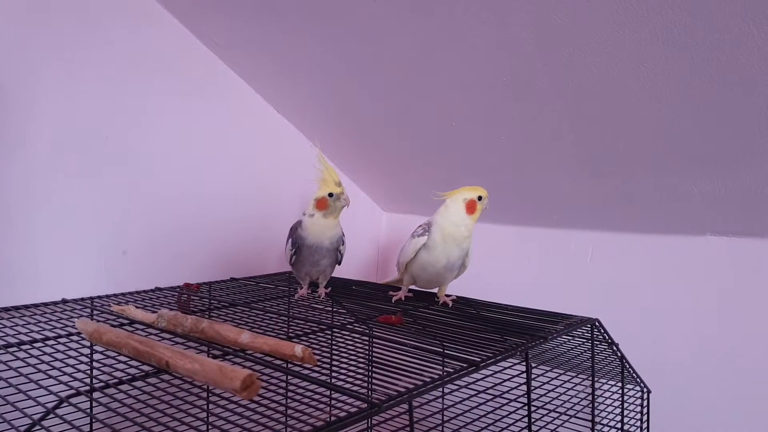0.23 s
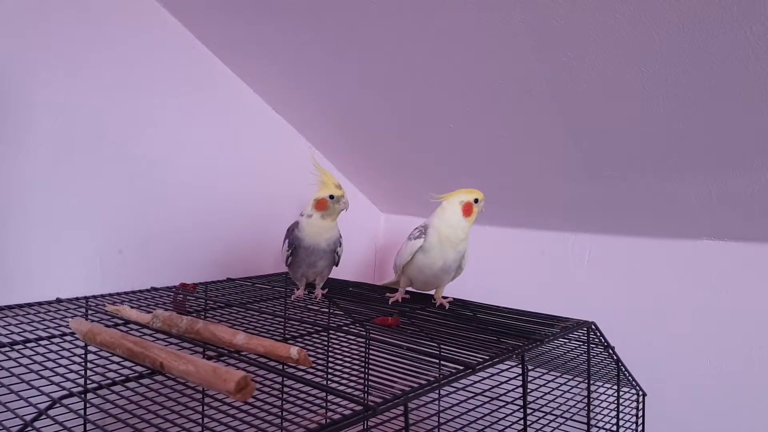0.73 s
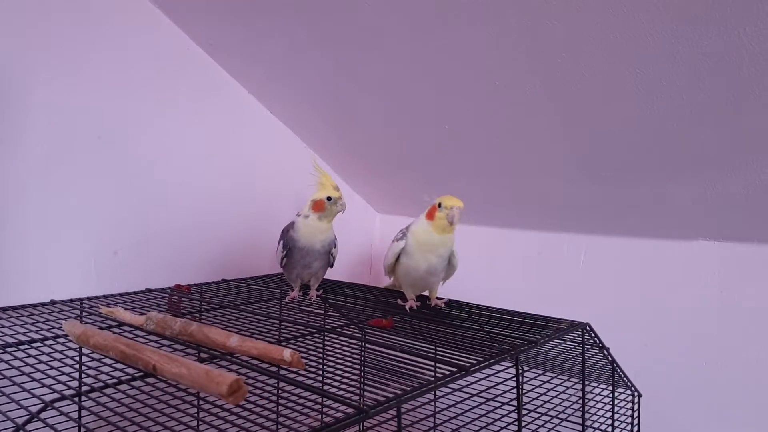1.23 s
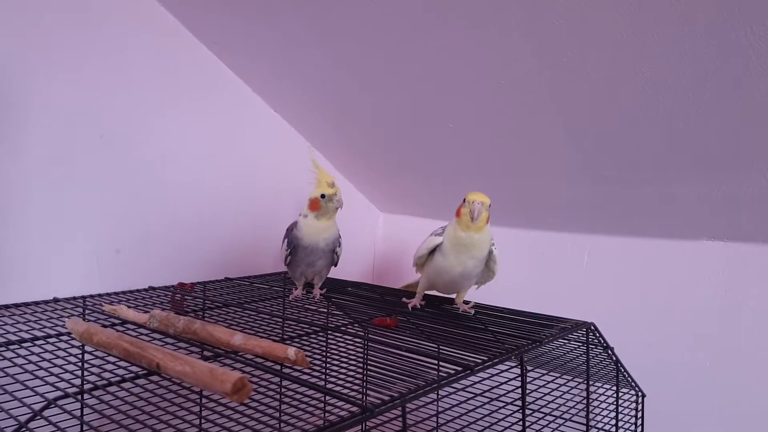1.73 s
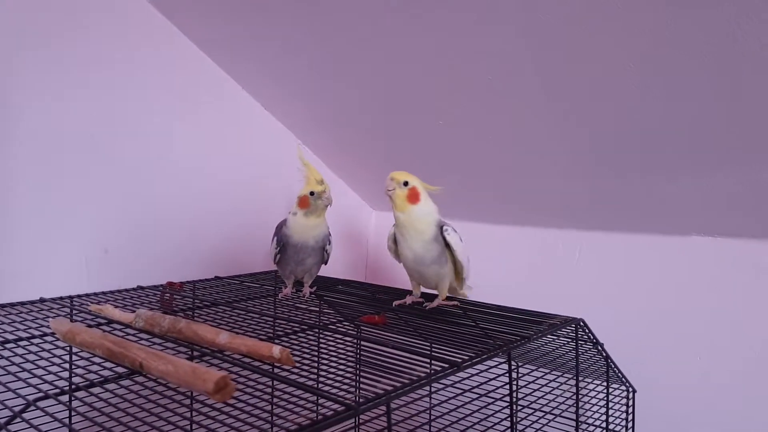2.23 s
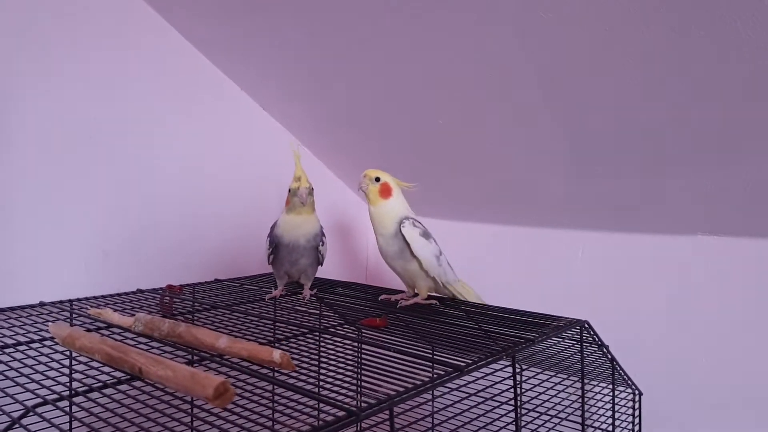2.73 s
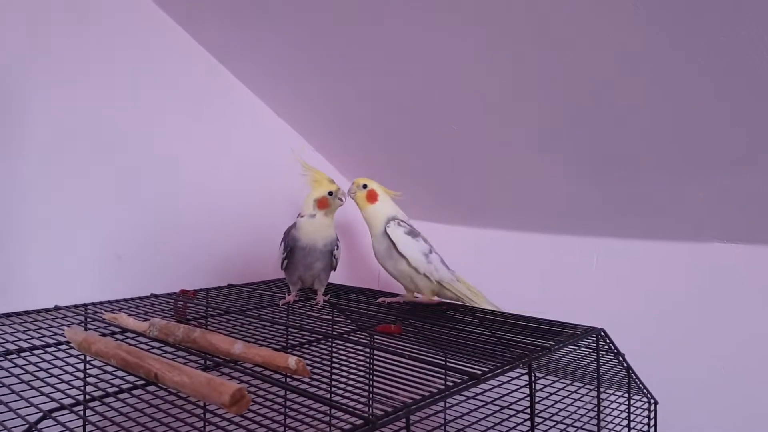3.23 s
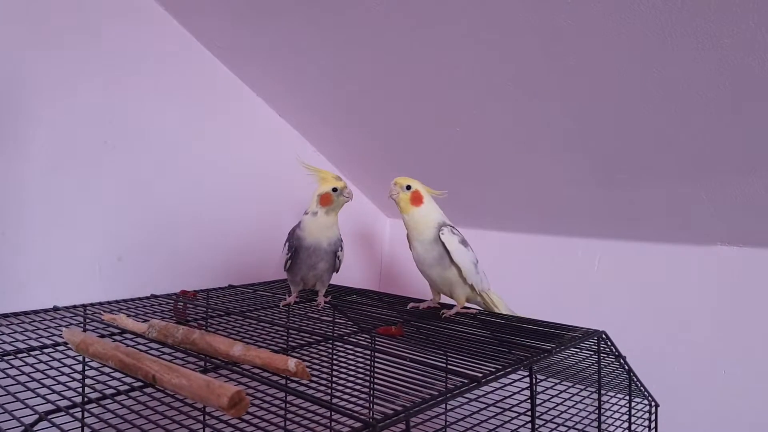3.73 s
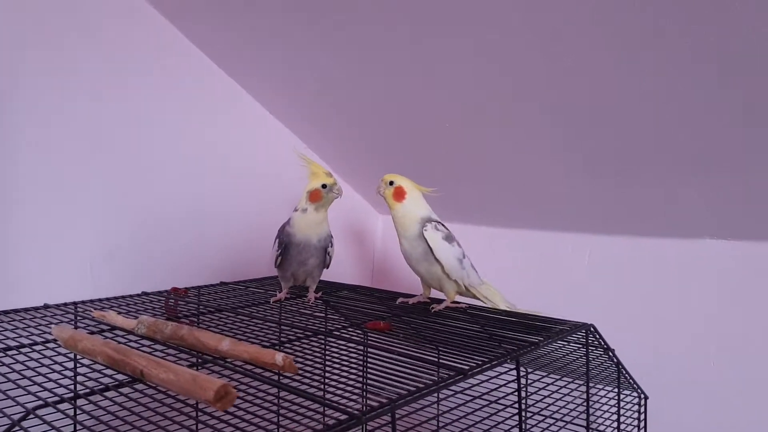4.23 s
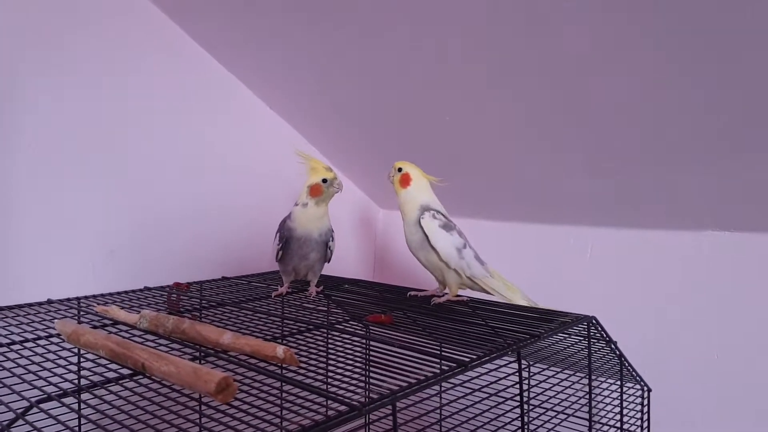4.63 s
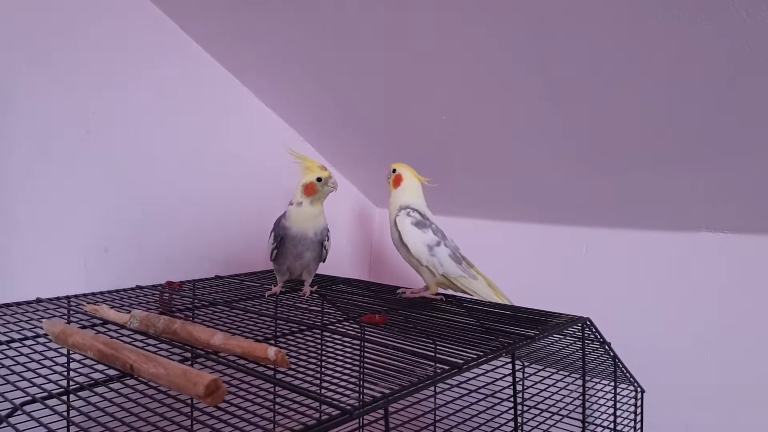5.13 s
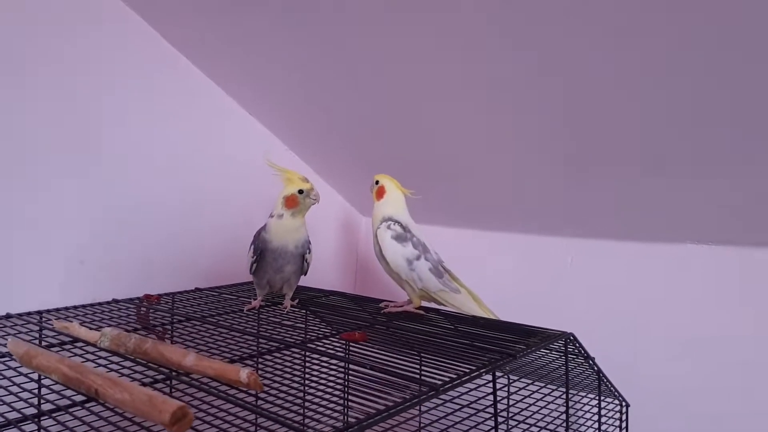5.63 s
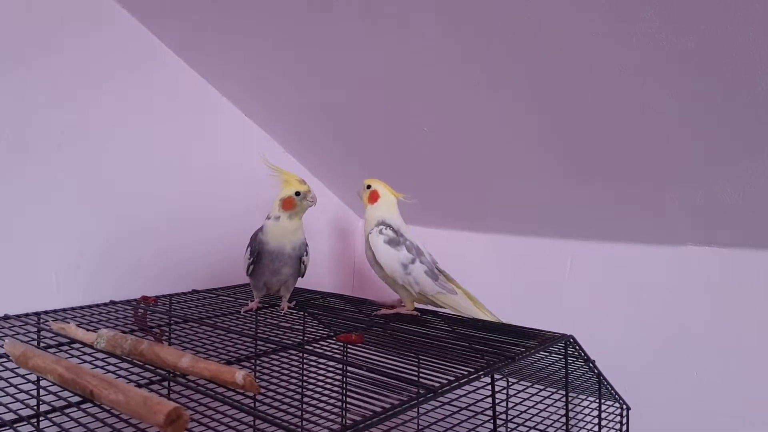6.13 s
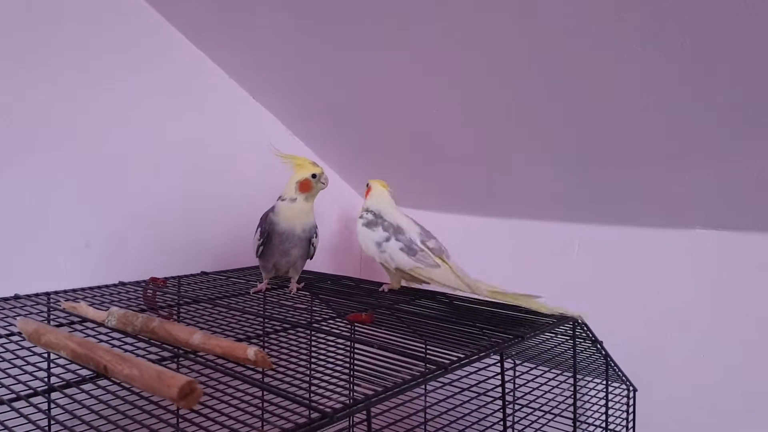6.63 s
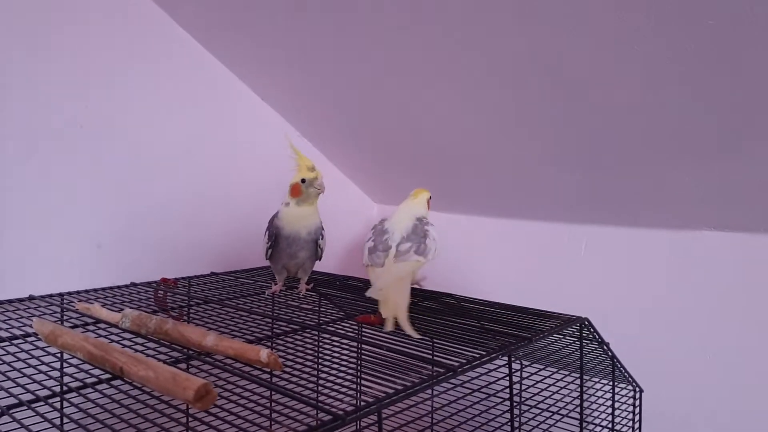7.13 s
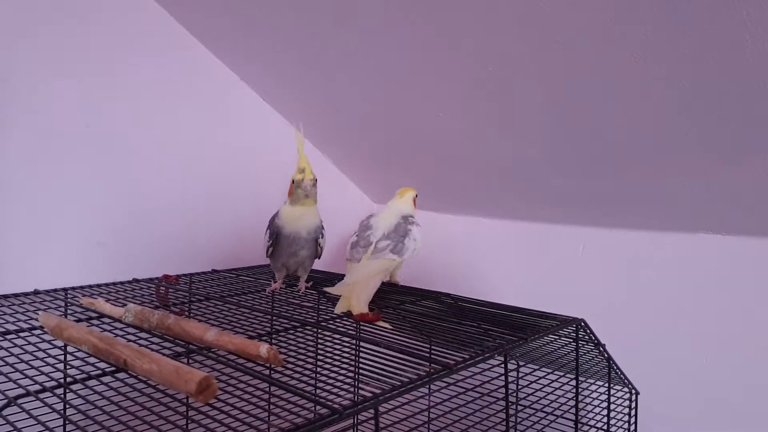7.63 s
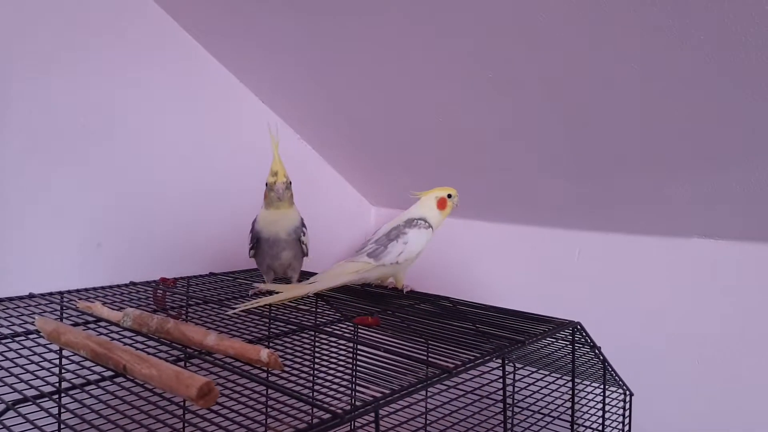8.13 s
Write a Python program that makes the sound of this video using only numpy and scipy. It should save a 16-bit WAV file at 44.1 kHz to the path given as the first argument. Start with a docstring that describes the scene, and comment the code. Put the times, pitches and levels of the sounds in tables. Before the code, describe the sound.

A faint low rumble, wavering mains hum and a thin high whine fill a quiet bare room, left of centre. At about 1.2 s a soft airy puff precedes a sharp, broken chirp at 1.5 s, loud and near, around 2.5 to 3 kHz; the whine then sinks away. From 2.15 to 2.7 s come three short whistles, the last strongest, with dull breath and slight wheeze. At 3.4 s a rising lead-in joins a sharp click and two bright arched notes that plunge low. Two tiny dull taps follow near 4.4 s on the right. The three-call group returns at 4.6 to 5.2 s, trailing a faint wheeze. After a pause and a small puff at 6.2 s, the bird warbles from 6.4 to 8.25 s: quick flicks, low rough steps, slow climbs and piercing arches near 3 kHz. Short echoes ring after the notes.

```python
"""Two small parrots sit on a wire cage under a sloping ceiling. A low rumble, a wavering mains hum and a thin
high whine (filtered noise and sines) come first; the whine sinks as the calls begin. After a puff of air, shaped
noise, one bird whistles short gliding notes, near-sines with a few overtones; a faint wheeze sounds during and
after some calls. A sharp click, then two dull taps, are modelled as pulses; near the end the bird warbles in low
steps, climbs and flicks. Air hisses around the notes, and the bare room rings on after them as decaying noise."""
import sys
import numpy as np
from scipy import signal
from scipy.fft import rfft, irfft
from scipy.io import wavfile
from scipy.ndimage import uniform_filter1d, minimum_filter1d

SR = 44100
rng = np.random.default_rng(int(sys.argv[2]) if len(sys.argv) > 2 else 0)


def to_linear_factor(level_db):
    """Convert decibel levels (scalar or array-like) to linear amplitude factors."""
    exponent = np.asarray(level_db, float) / 20
    return 10 ** exponent


def store_pcm(level_fs):
    """Save levels as 16-bit WAV."""
    pcm = np.round(np.clip(level_fs, -1, 1) * 32767).astype(np.int16)
    wavfile.write(sys.argv[1], SR, np.atleast_2d(pcm).T)


N = 370440
TIME = np.arange(N) / SR


def at_hz(points, hz):
    """Interpolation of a spectrum on a logarithmic frequency axis."""
    points = np.array(points)
    return np.interp(np.log(np.maximum(hz, 1)), np.log(points[:, 0]), points[:, 1])


def rms_one(x):
    """Normalization to unit root-mean-square amplitude."""
    return x / np.sqrt(np.mean(x ** 2) + 1e-20)


def drift(rate, size=N):
    """Slow random modulation: normal random points, rate per second (at most 400), joined by lines."""
    points = rng.standard_normal(int(N / SR * 400) + 2)
    return np.interp(np.arange(size) / SR * min(rate, 400), np.arange(len(points)), points)


def sides(pan_db):
    """Constant-power panning: left and right gains for a left-over-right level difference."""
    left = to_linear_factor(np.asarray(pan_db))
    return np.sqrt(2 / (1 + left ** 2)) * np.array([left, np.ones_like(left)])


def coloured(spectrum, alike, pan_db):
    """Partially coherent stereo noise: mid and side parts set the likeness in each band; rms 1."""
    hz = np.arange(N // 2 + 1) * SR / N
    mid, side = rfft(rng.standard_normal((2, N)))
    like = np.clip(at_hz(alike, hz), -1, 1)
    pair = np.sqrt(1 + like) * mid + np.sqrt(1 - like) * side * [[1], [-1]]
    gains = sides(at_hz(pan_db, hz)) * to_linear_factor(at_hz(spectrum, hz))
    return rms_one(irfft(pair * gains, N))


def fade(t, start, end, edge):
    """Sine-squared envelope, open between start and end, free of clicks."""
    return np.sin(np.pi / 2 * np.clip(np.minimum(t - start, end - t) / edge, 0, 1)) ** 2


# higher harmonics relative to the first: (multiple of the pitch, level [dB])
HARMONICS = [(3, -31), (4, -28), (5, -26.5), (6, -34.5), (7, -24.5), (8, -40.5), (9, -43.5), (10, -61),
             (11, -48.5), (12, -58)]
# throat, beak and microphone colour the higher harmonics: (frequency [Hz], gain [dB])
THROAT_COLOUR = [(3000, 6.5), (4500, 1.5), (6500, 1.5), (7800, -18.5), (9300, -7), (11000, 5), (13000, -5),
                 (15500, -18.5)]
# the head turns: (time [s], left over right [dB], left lags by [ms], brightness of the higher harmonics [dB])
HEAD_TURNS = [(1.54, 10.5, .057, 1.3), (2.15, 8, 0.15, -2), (2.35, 9.5, .066, 2.5), (2.531, 9, .04, -0.5),
              (3.42, 10, .05, -4), (3.561, 6, 0.091, -0.5), (4.632, 7.5, .12, -2), (4.842, 7, 0.1, 6),
              (5.029, 2, -.04, 2), (6.39, 13, -0.098, 2), (6.55, -2, 0.19, -3.5), (6.801, 8.5, .04, 1.5),
              (7.152, 11.5, -0.073, -2), (7.42, 4.5, -.08, -0.5), (7.701, 9.5, 0.14, 2), (8.0, 7, .07, -.5),
              (8.085, 11, .06, 0.7), (8.22, -4, .04, -22)]
# air leaks past slack membranes in low notes: level at the reference pitch, gain per octave below it
LEAK_DB, LEAK_HZ, LEAK_DB_PER_OCT = -65.5, 1500, 4.5


def whistles(jitter=.003, shimmer_db=1.2, rasp=.3, effort=.2):
    """Harmonic synthesis by phase integration: unsteady gliding tones, brighter when blown harder."""
    near, (mono, leak) = np.zeros((2, N)), np.zeros((2, N))
    wobble, shimmer = jitter * drift(250), to_linear_factor(shimmer_db * drift(120))
    grain = np.array([drift(390) for _ in range(3)])
    turns, *head = np.transpose(HEAD_TURNS)
    for s, hz, level_db, second_db in notes():
        pan_db, lag_ms, bright_db = [np.interp(s[0], turns, column) for column in head]
        span = slice(int(s[0] * SR), int((s[-1] + .003) * SR))
        t = TIME[span]
        glide = uniform_filter1d(np.interp(t, s, hz), size=130)
        pitch = glide * (1 + wobble[span] * (3000 / glide) ** 2)   # low notes waver more
        phase = 2 * np.pi * np.cumsum(pitch) / SR
        level = np.interp(t, s, level_db)
        second = to_linear_factor(np.interp(t, s, second_db)) * (1 + rasp * grain[2, span])
        note = np.sin(phase) + second * np.sin(2 * phase)
        slack = rasp * (2900 / pitch) ** 2   # low notes come from slack, rougher membranes
        for k, order_db in HARMONICS:
            k = round(k)
            colour_db = bright_db + at_hz(THROAT_COLOUR, k * pitch) + effort * (level + 13)
            strength = to_linear_factor(order_db + colour_db) * (k * pitch < .4 * SR)
            note += strength * (1 + slack * grain[k % 3, span]) * np.sin(k * phase)
        note *= shimmer[span] * to_linear_factor(level + 3.5) * fade(t, t[0], t[-1], 0.0022)
        lagged = np.interp(t - lag_ms / 1000, t, note)
        near[:, span] += sides(pan_db)[:, None] * [lagged, note]
        mono[span] += note
        leak[span] += to_linear_factor(LEAK_DB - LEAK_DB_PER_OCT * np.log2(glide / LEAK_HZ))
    return near, mono, leak


def notes():
    """Source control: every note as times, pitches, relative levels and second harmonics."""
    return sharp_calls() + arches() + steps() + climbs() + flicks()


def under_top(s, hz, second_db, top_hz, level_db, db_per_oct):
    """Pitch-dependent source strength: a glide is weaker the lower it lies."""
    return s, hz, level_db + db_per_oct * np.log2(hz / top_hz), second_db


# call shapes at unit stretch and pitch factor:
# (time from the onset [s], pitch [Hz], effort [dB], second harmonic against the first [dB])
CHIRP_SHAPE = [(0, 2330, -17, -26), (.012, 2562, 3, -24.5), (.044, 2737, -8, -11.5), (.072, 2745, -2, -29),
               (.082, 2505, -5.5, -18), (.092, 1819, -9.5, 1.5), (.102, 1898, -31, -7.5),
               (.112, 2771, 2, -27), (.126, 3057, -4, -21), (.139, 2838, -13.5, -31.5),
               (.154, 2463, 0.5, -27.5), (.166, 2613, -5.5, -17), (.182, 2396, -11, -37)]
OPENER_SHAPE = [(0, 2482, -5.5, -33.5), (.015, 2647, -0.5, -16.5), (.05, 2701, -0.5, -25.5),
                (.09, 2721, 1.5, -21.5), (.108, 2940, 1, -19.5), (.128, 2763, -11.5, -49),
                (.14, 2750, -26.5, -35)]
SLIDE_SHAPE = [(0, 3262, -21, -14), (.036, 3168, -30, -13), (.079, 3226, -17.5, -15.5),
               (.097, 3233, -8, -17.5), (.104, 2927, -2.5, -11), (.131, 2722, -1, -26.5),
               (.146, 2320, 1.5, -5), (.16, 2241, -9, -1), (.177, 2190, -1.5, -11.5), (.184, 2353, -2, -14)]
SAG_SHAPE = [(0, 3039, -0.5, -16), (.028, 3128, 0, -17.5), (.044, 2990, 0, -30), (.085, 3038, -5.5, -17.5),
             (.12, 2899, -4, -24), (.16, 2810, -14.5, -18.5), (.169, 2780, -22, -9.5),
             (.175, 1800, -29.5, -0.5)]
LEAD_IN_SHAPE = [(0, 1395, -19, -12.5), (.011, 1566, -6.5, -32.5), (.026, 1802, -9, -20),
                 (.048, 2120, 3, -40.5)]
# the calls of each shape: (time [s], stretch in time, pitch factor, relative level [dB])
CHIRP_CALLS = [(1.536, 1.001, 1.001, -12)]
OPENER_CALLS = [(2.147, .96, .995, -17), (4.629, 1.02, 1.005, -17.5)]
SLIDE_CALLS = [(2.347, .997, .99, -18), (4.844, 0.98, 1.015, -18)]
SAG_CALLS = [(2.53, 1.03, .995, -13.5), (5.028, .96, 1.005, -13)]
LEAD_IN_CALLS = [(3.374, 1.001, 1.001, -21)]


def sharp_calls():
    """Similarity of repeated calls: one shape stretched in time and scaled in pitch and level."""
    out = []
    for shape, calls in [(CHIRP_SHAPE, CHIRP_CALLS), (OPENER_SHAPE, OPENER_CALLS), (SLIDE_SHAPE, SLIDE_CALLS),
                         (SAG_SHAPE, SAG_CALLS), (LEAD_IN_SHAPE, LEAD_IN_CALLS)]:
        after, hz, effort_db, second = np.transpose(shape)
        for s, stretch, factor, db in calls:
            out.append((s + after * stretch, hz * factor, db + effort_db, second))
    return out


# arched whistles: (time [s], rise [s], hold [s], plunge [s], from [Hz], top [Hz], relative level [dB])
ARCH_NOTES = [(3.42, 0.013, .03, 0.037, 2536, 2713, -11.5), (3.553, .033, .075, 0.02, 1396, 2747, -13),
              (6.587, 0.032, .097, 0.06, 1815, 3037, -15), (7.203, .048, .112, .045, 1175, 3064, -16),
              (8.083, .035, .042, .024, 2190, 2882, -19.5)]
# (share of the rise, share of the way up to the shoulder, second harmonic [dB])
ARCH_RISE_SHAPE = [(0, 0.015, -23.5), (.25, .3, -33), (.5, .68, -34.5), (.75, .9, -28), (1, 1, -24)]
# (share of the plunge, share of the top pitch, second harmonic [dB])
PLUNGE_SHAPE = [(0, 0.95, -29.5), (0.201, .87, -29.5), (0.361, .63, -3.5), (.65, .48, -18), (1, .45, -23)]
# the rise aims at a shoulder under the top; holds longer than steady dip first
SHOULDER, DIP_PER_S, STEADY_S = 0.93, 1.2, .07
HOLD_SECOND_DB, ARCH_DB_PER_OCT = -26, 23.5


def arches():
    """Frequency modulation in an arch: the pitch rises, holds and plunges low."""
    up, rising, early = np.transpose(ARCH_RISE_SHAPE)
    down, falling, late = np.transpose(PLUNGE_SHAPE)
    second = np.r_[early, HOLD_SECOND_DB, HOLD_SECOND_DB, late]
    out = []
    for s, rise, hold, plunge, low, top, db in ARCH_NOTES:
        times = s + np.r_[up * rise, rise + hold * .35, rise + hold * .75, rise + hold + down * plunge]
        dipped = (1 + SHOULDER) / 2 - DIP_PER_S * max(hold - STEADY_S, 0)
        hz = np.r_[low + rising * (SHOULDER * top - low), top * np.r_[dipped, 1, falling]]
        out.append(under_top(times, hz, second, top, db, ARCH_DB_PER_OCT))
    return out


# low warbled steps: (time [s], rise [s], hold [s], drop [s], top [Hz], end [Hz], relative level [dB])
STEP_NOTES = [(6.488, .052, .03, .018, 1745, 1815, -29.5), (7.1, .048, .012, .038, 1784, 1138, -28),
              (7.829, .088, .022, 0.0047, 2097, 1550, -23)]
# (share of the rise, share of the way up, second harmonic [dB])
STEP_RISE_SHAPE = [(0, 0, -14), (.4, .15, -12), (0.702, 0.47, -13), (.85, .85, -29.5), (1, 0.98, -30.5)]
# second harmonic at the end of the hold and of the drop: (level [dB])
STEP_LAST_SECOND = [-16, -6.5]
LOW_HZ, STEP_DB_PER_OCT = 1085, 26.5


def steps():
    """Register glide: from the low register the pitch rises, holds just under the top and glides off."""
    up, share, second = np.transpose(STEP_RISE_SHAPE)
    out = []
    for s, rise, hold, drop, top, end, db in STEP_NOTES:
        times = s + np.r_[up * rise, rise + hold, rise + hold + drop]
        hz = np.r_[LOW_HZ + share * (top - LOW_HZ), .98 * top, end]
        out.append(under_top(times, hz, np.r_[second, STEP_LAST_SECOND], top, db, STEP_DB_PER_OCT))
    return out


# slow climbs: (time [s], length [s], top [Hz], relative level [dB])
CLIMB_NOTES = [(6.808, .21, 1747, -28), (7.43, .18, 1797, -25)]
# (share of the length, share of the top pitch, second harmonic [dB])
CLIMB_SHAPE = [(0, .71, -14), (.25, .755, -13.5), (.68, .785, -20.5), (0.809, .88, -17), (.9, .945, -9),
               (1.002, 0.99, -15)]
CLIMB_DB_PER_OCT = 35.5


def climbs():
    """Slow upward frequency modulation out of the low register."""
    along, share, second = np.transpose(CLIMB_SHAPE)
    return [under_top(s + along * length, share * top, second, top, db, CLIMB_DB_PER_OCT)
            for s, length, top, db in CLIMB_NOTES]


# quick flicks, mostly upward: (time [s], length [s], from [Hz], to [Hz], relative level [dB])
FLICK_NOTES = [(6.395, 0.042, 1827, 2666, -24), (7.687, .055, 1130, 2685, -31),
               (8.003, 0.045, 1354, 2382, -33), (8.229, 0.019, 1293, 1750, -39.5),
               (7.945, 0.011, 1600, 1477, -34), (8.17, .018, 1650, 1428, -34.5)]
# (share of the length, share of the way, second harmonic [dB])
FLICK_SHAPE = [(0, 0, -15), (.24, .55, -51), (.52, 0.61, -20), (.76, 1, -26.5), (1, .88, -25)]
FLICK_DB_PER_OCT = 3


def flicks():
    """Rapid frequency modulation: a short sweep from one pitch to another."""
    along, share, second = np.transpose(FLICK_SHAPE)
    return [under_top(s + along * length, low + share * (top - low), second, top, db, FLICK_DB_PER_OCT)
            for s, length, low, top, db in FLICK_NOTES]


# strong-weak beating of the syrinx:
# (from [s], to [s], from pitch [Hz], to pitch [Hz], line at 3/2 of the pitch [dB], line at 1/2 [dB])
PERIOD_DOUBLING = [(3.512, 3.557, 1257, 1215, -38.5, -53), (6.77, 6.949, 1278, 1391, -37, -50),
                   (7.408, 7.551, 1263, 1407, -37.5, -51), (7.838, 7.88, 1165, 1330, -38, -59),
                   (8.194, 8.237, 1260, 1430, -44, -56.5)]
UPPER_LINE_DB = -22   # the line at 5/2 against that at 3/2


def half_steps():
    """Period doubling: strong-weak beats of the syrinx put lines halfway between the harmonics."""
    out = np.zeros(N)
    for start, end, from_hz, to_hz, level_db, under_db in PERIOD_DOUBLING:
        span = slice(int(start * SR), int(end * SR))
        pitch = np.interp(TIME[span], [start, end], [from_hz, to_hz])
        phase = 2 * np.pi * np.cumsum(pitch) / SR
        levels_db = [under_db, level_db, level_db + UPPER_LINE_DB]
        lines = sum(to_linear_factor(db) * np.sin((k + .5) * phase) for k, db in enumerate(levels_db))
        out[span] += fade(TIME[span], start, end, 0.006) * lines
    return out * to_linear_factor(1.8 * drift(65))


# windpipe resonances: (frequency [Hz], nominal width before a 1.5-fold widening [Hz], gain [dB])
WINDPIPE_BANDS = [(576, 290, -5), (1100, 55, -4), (1890, 740, -3), (3060, 490, 0.5), (4882, 250, 1),
                  (6920, 310, -1.5), (10560, 2700, -7.5), (12000, 2100, -11.5), (14560, 1000, -11.5)]


def windpipe(x, low_hz, high_hz, bands=WINDPIPE_BANDS):
    """Parallel resonators with centres in a range, each applied twice for dark valleys between them."""
    out = 0
    for hz, width, db in bands:
        r = np.exp(-np.pi * 1.5 * width / SR)
        b = [(1 - r * r) / 2, 0, (r * r - 1) / 2]
        a = [1, -2 * r * np.cos(2 * np.pi * hz / SR), r * r]
        if low_hz <= hz < high_hz:
            out = out + to_linear_factor(db) * signal.lfilter(b, a, signal.lfilter(b, a, x))
    return out


# bright puffs before a phrase: (time [s], relative level [dB], fade t60 [s])
BRIGHT_PUFFS = [(1.169, -49, 0.77), (4.507, -63, 0.66), (6.202, -58.5, 0.7)]
PUFF_RISE_S, PUFF_HOLD_S, PUFF_TREBLE_DB = 0.011, 0.012, 0.7
# dull rasps around the notes: (time [s], relative level [dB], rise [s], hold [s], treble against bass [dB])
DULL_RASPS = [(1.44, -62, 0.035, .08, -31), (2.292, -51, 0.066, 0.096, -13.5),
              (2.652, -51.5, 0.023, 0.088, -22), (2.699, -52.5, 0.0067, 0.011, -10),
              (3.048, -74, 0.038, .07, -27), (3.482, -49, .009, 0.045, -21),
              (3.668, -57, 0.0074, 0.054, -19), (4.832, -55.5, 0.018, 0.27, -7.5),
              (5.18, -55.5, 0.0017, .02, -5), (6.72, -49.5, .012, 0.074, -17),
              (7.378, -51, 0.0065, .11, -31.5), (8.053, -54, 0.0045, .03, -8),
              (8.166, -55.5, .005, 0.039, -11)]
RASP_T60_S = .16
LEAK_TREBLE_DB, LEAK_T60_S = -8.5, .15


def puffs(leak):
    """Turbulence noise: air hisses through the windpipe, holds and decays; the treble decays faster."""
    r = to_linear_factor(-120 / (LEAK_T60_S * SR))
    low_power = signal.lfilter([1 - r], [1, -r], leak ** 2)
    high_power = low_power * to_linear_factor(2 * LEAK_TREBLE_DB)
    rows = [(s, db, PUFF_RISE_S, PUFF_HOLD_S, t60, PUFF_TREBLE_DB) for s, db, t60 in BRIGHT_PUFFS]
    rows += [(*rasp, RASP_T60_S, treble_db) for *rasp, treble_db in DULL_RASPS]
    for s, level_db, rise, hold, t60, treble_db in rows:
        span = slice(int(s * SR), int(s * SR) + SR)
        t = TIME[span] - s
        gate = np.clip(t / rise, 0, 1)
        age = np.clip(t - rise - hold, 0, 2) / t60
        low_power[span] += (gate * to_linear_factor(level_db - 60 * age)) ** 2
        high_power[span] += (gate * to_linear_factor(level_db + treble_db - 62 * age)) ** 2
    air = rng.standard_normal(N) * to_linear_factor(3 * drift(30))
    low = np.sqrt(low_power) * rms_one(windpipe(air, 0, 4000))
    high = np.sqrt(high_power) * rms_one(windpipe(air, 4000, SR))
    return low + high


# a faint wheeze sounds during and after some calls: (time [s], relative level [dB], fade t60 [s])
WHEEZE_TIMES = [(2.3, -67, .8), (2.741, -77, 1.0), (4.85, -58.5, 0.58), (5.22, -59.5, 1.3)]
# its bands: (frequency [Hz], nominal width before a 1.5-fold widening [Hz], gain [dB])
WHEEZE_RESONANCES = [(1034, 32, -1), (1430, 170, -14.5), (1953, 110, 1), (3350, 33, 8), (3850, 200, -13)]


def wheeze():
    """Resonance-filtered noise in narrow bands, with a quick swell and an exponential decay."""
    level = 0
    for s, db, t60 in WHEEZE_TIMES:
        swell = np.clip((TIME - s) / 0.025, 0, 1)
        level = level + swell * to_linear_factor(db - 60 * np.clip(TIME - s, 0, 3) / t60)
    return level * rms_one(windpipe(rng.standard_normal(N), 0, SR, WHEEZE_RESONANCES))


# decay of the main echo tail: (frequency [Hz], t60 [s])
ROOM_DECAY = [(700, 0.75), (2000, 0.3217), (3000, 0.39), (6000, 0.24), (12000, 0.23)]
# colour of the echoes: (frequency [Hz], gain [dB])
ECHO_COLOUR = [(700, 0.93), (2000, 0), (3000, -2.1), (6000, 0.99), (12000, 0.88)]


def room(x, gap=0.0019, early_db=7, early_t60=0.067, late_db=-26, late_stretch=2.46, shared=0.96):
    """Reverberation: strong near-corner echoes, a dense tail by band, a faint slow one; partly alike at both ears."""
    t, echoes = TIME[:SR], 0
    edges = 350 * 2 ** np.arange(0, 6, .5)   # half octaves [Hz]
    for low, high in zip(edges, edges[1:]):
        hz = np.sqrt(low * high)
        t60 = at_hz(ROOM_DECAY, hz)
        early = to_linear_factor(early_db - 60 * t / early_t60)
        late = to_linear_factor(late_db - 60 * t / t60 / late_stretch)
        dying = to_linear_factor(-60 * t / t60) + late + early
        band = signal.butter(2, [low, high], "band", fs=SR, output="sos")
        left, right, both = signal.sosfilt(band, rng.standard_normal((3, SR)))
        pair = np.array([left, right]) + shared * np.array([np.roll(both, 3), both])
        echoes = echoes + pair * dying * to_linear_factor(at_hz(ECHO_COLOUR, hz)) / np.sqrt(t60)
    echoes = rms_one(echoes * np.clip(t / gap - 1, 0, 1))   # silent up to the gap [s]
    return signal.fftconvolve(x[None], echoes / np.sqrt(SR), axes=1)[:, :N]


# a sharp click, then two dull taps: (time [s], pulse scale [dB], width [s], left over right [dB])
PULSES = [(3.423, -22, .00008, 20), (4.3963, -38, 0.00065, -16), (4.408, -41, 0.00055, -15)]


def click_and_taps():
    """Impulse excitation: a sharp dip, a push and a slower swing back; the narrower, the sharper."""
    out = np.zeros((2, N))
    for s, peak_db, width, pan_db in PULSES:
        u = (TIME - s) / width
        push = np.clip(u - .6, 0, 50)
        dip, swing = np.exp(-1.6 * abs(u)), 0.65 * np.exp(-((u - 7) / 3.9) ** 2)
        shape = 2.8 * push * np.exp(-push) - dip - swing
        out += to_linear_factor(peak_db) * shape * sides(pan_db)[:, None]
    return out


# common level of rumble and hum, before a 2 dB lift: (time [s], level [dB])
BACKGROUND_LEVEL = [(0.0, -62), (0.37, -65.5), (0.96, -65), (1.33, -59.5), (1.57, -63.5), (1.87, -74),
                    (2.4, -66.5), (3.06, -67), (3.36, -70), (5.0, -69), (5.6, -73.5), (6.6, -69.5),
                    (8.05, -67), (8.4, -70)]
# rumble spectrum, relative: (frequency [Hz], density [dB per Hz])
RUMBLE_SPECTRUM = [(18, -32.5), (30, 1), (66, -2), (130, -10.5), (341, -5.5), (420, -11.5), (639, -23),
                   (1140, -22.5), (1550, -28.5), (3880, -35.5), (4910, -28), (5740, -37.5), (7650, -46),
                   (15500, -38.5)]
# (frequency [Hz], left-right likeness)
RUMBLE_LIKENESS = [(60, 0.74), (240, 0.68), (950, -0.51), (3770, -0.14), (15000, -0.17)]
# (frequency [Hz], left over right [dB])
RUMBLE_BALANCE = [(60, 10), (240, 13), (950, 7), (3770, 6.5), (15000, 6.5)]
# hum lines about which level and pitch waver: (frequency [Hz], level against the rumble [dB])
HUM_LINES = [(59.5, -8), (119, -18.5), (178, -11), (238, -9), (300, -10.5), (360, -9.5), (400, -4),
             (420, -12), (540, -17)]


def rumble_and_hum():
    """Broadband noise plus line spectrum: a low rumble and mains hum wavering in level and pitch."""
    hum = 0
    for hz, db in HUM_LINES:
        level = to_linear_factor(db + 4.5 * drift(3.6))
        hum = hum + level * np.sin(2 * np.pi * np.cumsum(hz + .8 * drift(1.2)) / SR)
    rumble = coloured(RUMBLE_SPECTRUM, RUMBLE_LIKENESS, RUMBLE_BALANCE) * to_linear_factor(1.0 * drift(13))
    level_db = np.interp(TIME, *np.transpose(BACKGROUND_LEVEL)) + 2.0
    return (rumble + hum * sides(5)[:, None]) * to_linear_factor(level_db)


# the whine drops out once, then sinks when the calls begin: (time [s], level [dB])
WHINE_LEVEL = [(0, -82), (.32, -79.5), (.36, -104), (.42, -99), (.46, -79.5), (1.5, -76), (1.8, -96),
               (8.4, -99)]


def whine():
    """Narrow-band noise near 5 kHz, heard as a thin high whine."""
    spectrum = [(4500, -38), (4830, -7.0), (5010, 0.5), (5100, -5.5), (5400, -40.5)]   # (Hz, dB)
    band = coloured(spectrum, [(5000, 0.22)], [(5000, 8.3)])
    return band * to_linear_factor(np.interp(TIME, *np.transpose(WHINE_LEVEL)))


def scene():
    """Superposition of direct and reverberant sound: voice and air, over click, taps and background."""
    near, mono, leak = whistles()
    air_and_lines = half_steps() + puffs(leak) + wheeze()
    wet = to_linear_factor(-3.0) * sides(4.0)[:, None] * room(mono + air_and_lines)
    direct = to_linear_factor(-2.0) * (near + air_and_lines * sides(9.4)[:, None])
    return direct + wet + click_and_taps() + rumble_and_hum() + whine()


def roll_off(x):
    """The treble ends steeply here."""
    return signal.sosfilt(signal.butter(12, 15970, fs=SR, output="sos"), x)


def record(dry, top=.87):
    """High-pass filtering and peak limiting: the deepest bass is cut, the loudest peaks turned down."""
    cut = signal.sosfilt(signal.butter(4, 36, "high", fs=SR, output="sos"), dry)
    needed = np.minimum(1, top / (abs(cut).max(axis=0) + 1e-9))
    gain = uniform_filter1d(minimum_filter1d(needed, size=441), size=441)   # 10 ms windows
    return roll_off(cut * gain)


dry = scene()
out = record(dry)
store_pcm(out)
```